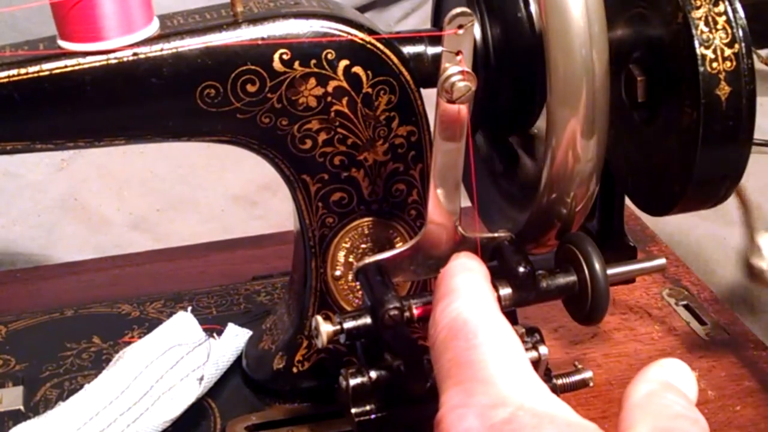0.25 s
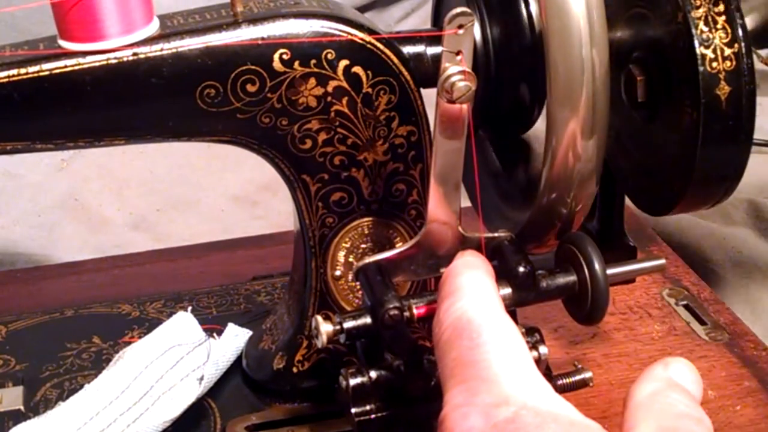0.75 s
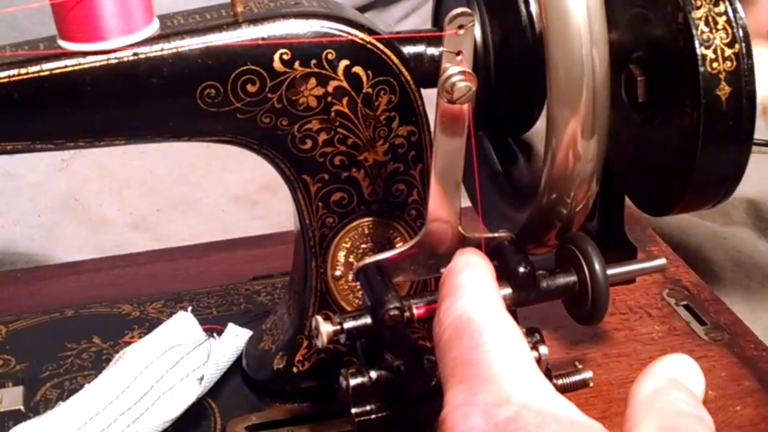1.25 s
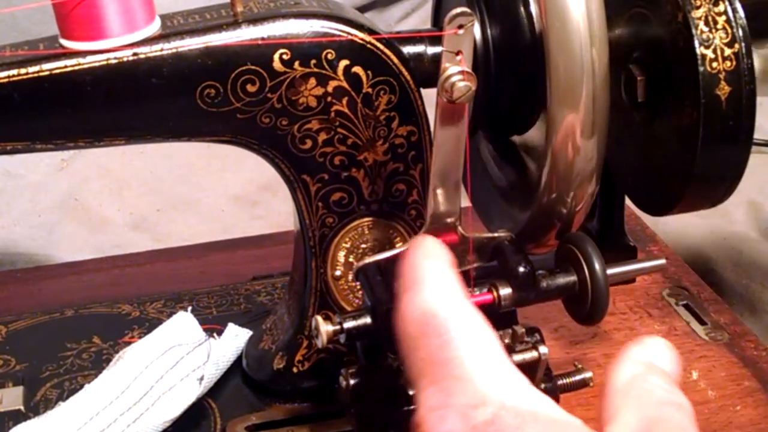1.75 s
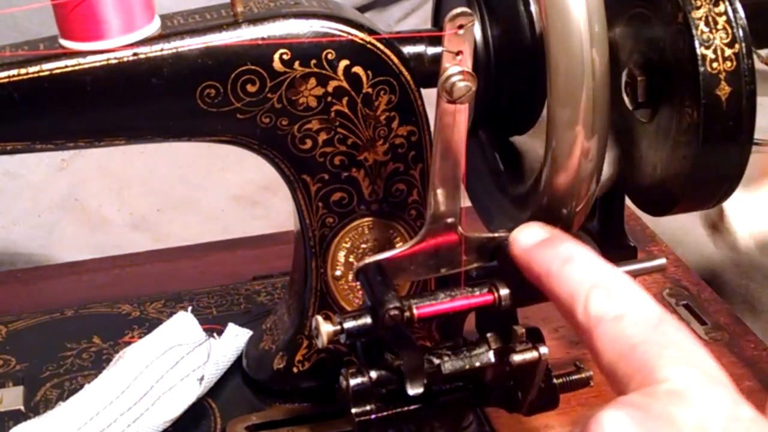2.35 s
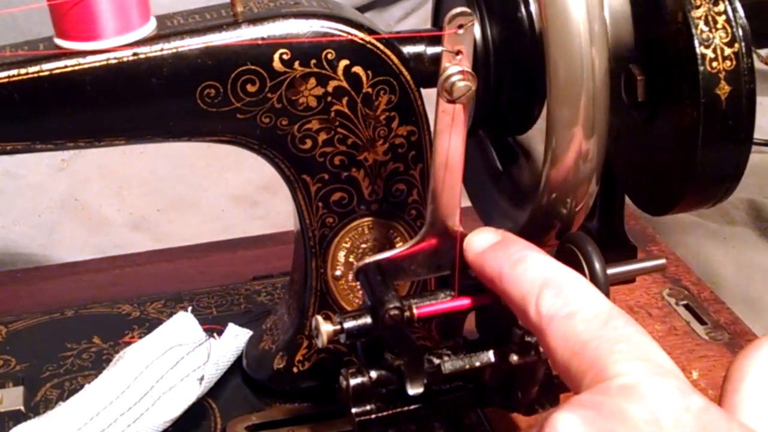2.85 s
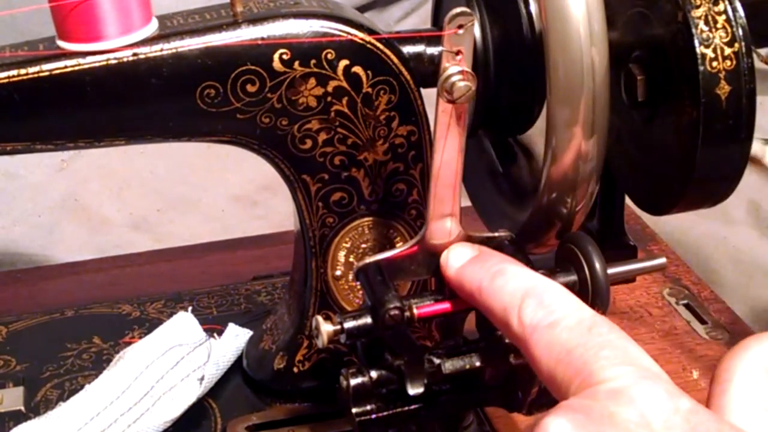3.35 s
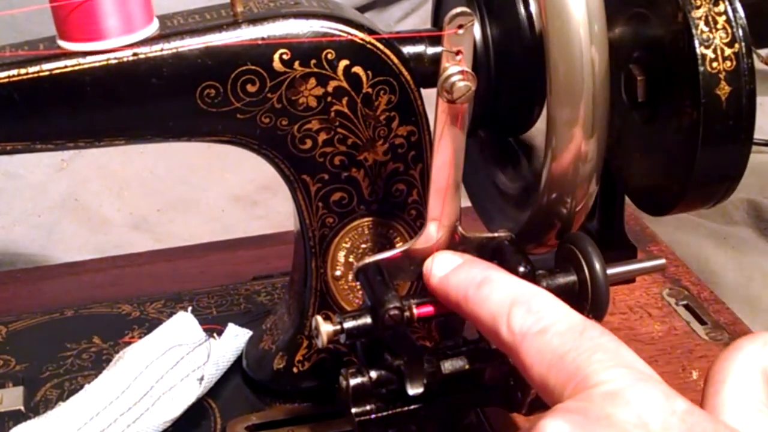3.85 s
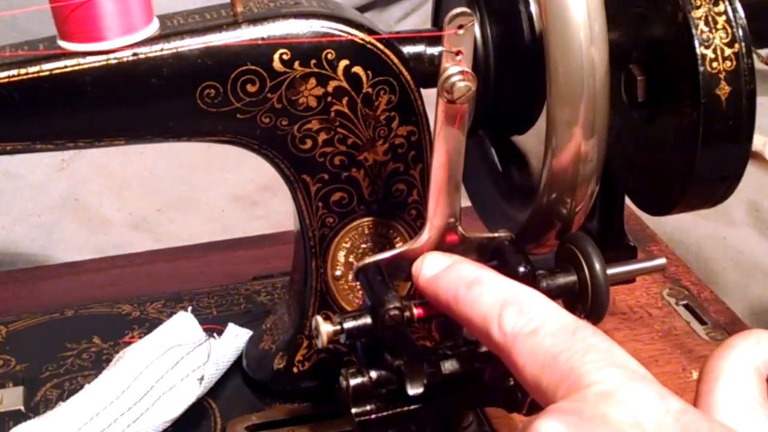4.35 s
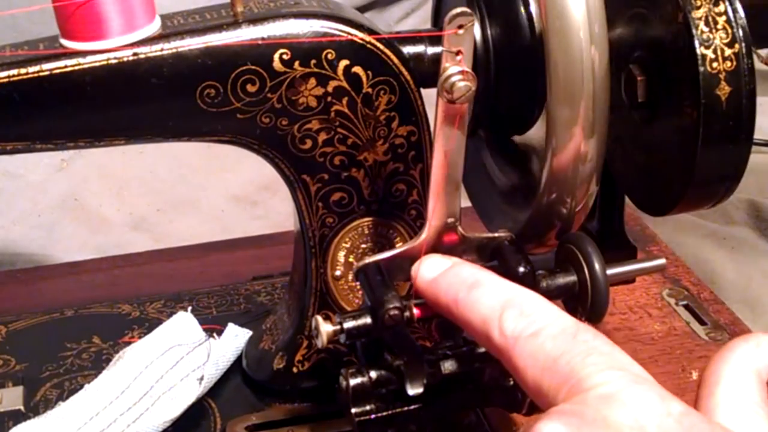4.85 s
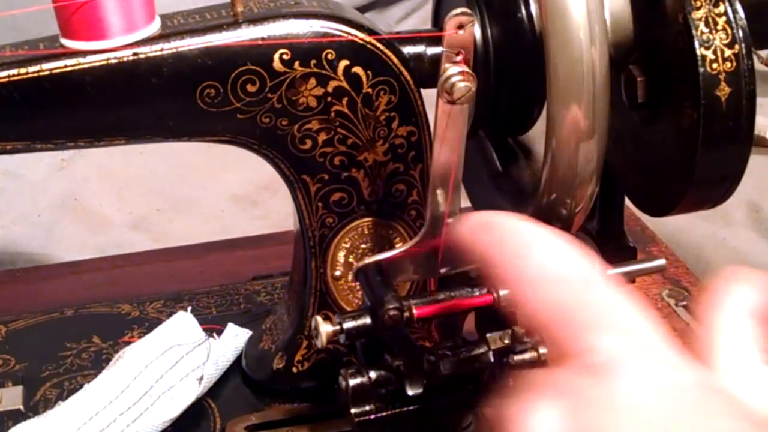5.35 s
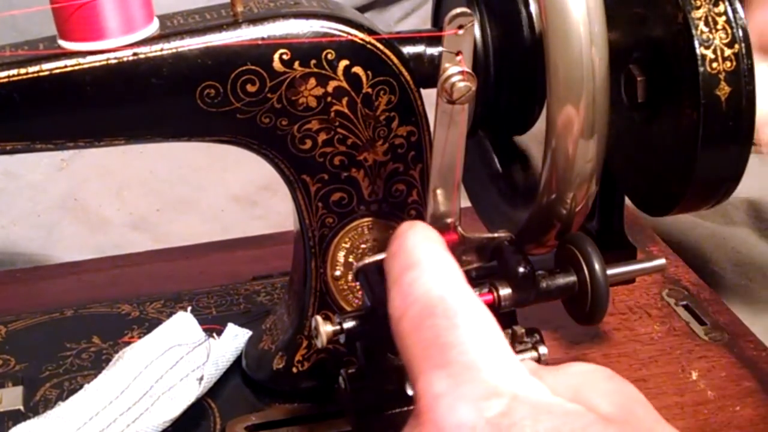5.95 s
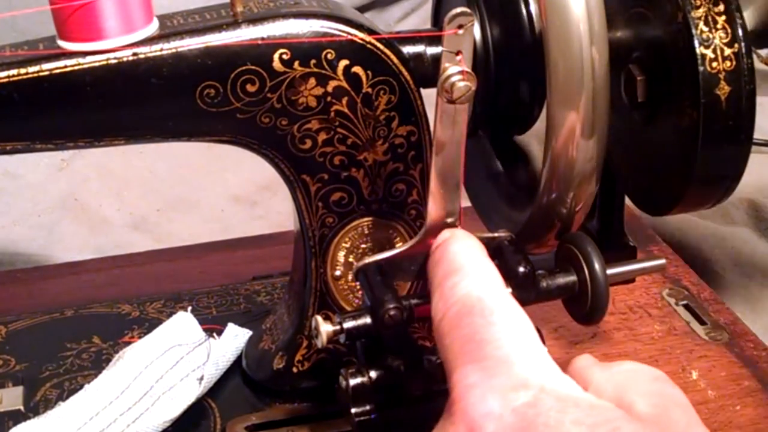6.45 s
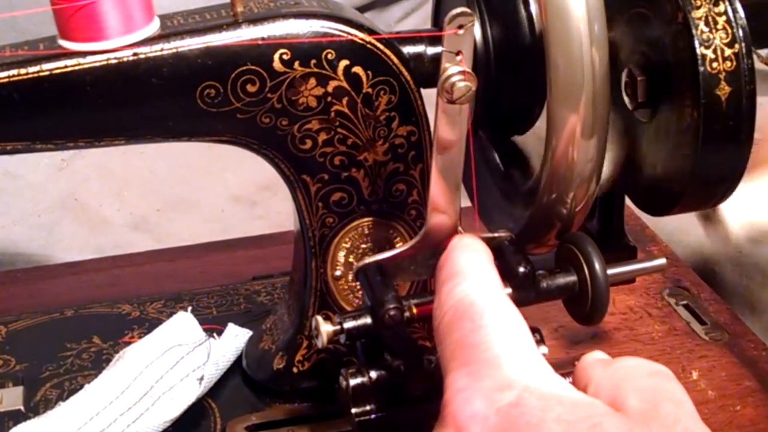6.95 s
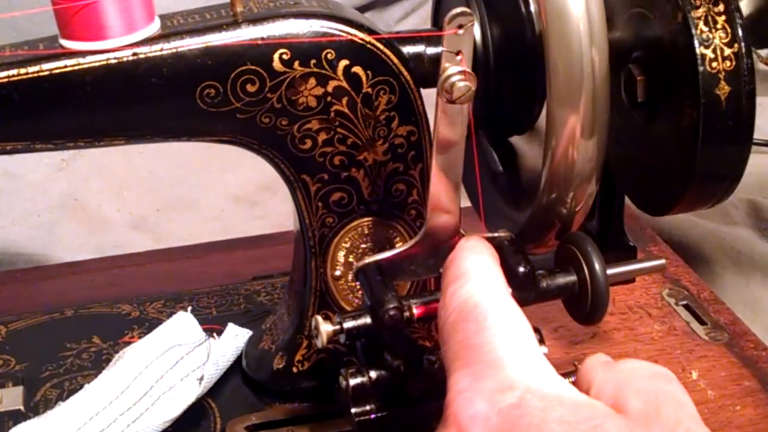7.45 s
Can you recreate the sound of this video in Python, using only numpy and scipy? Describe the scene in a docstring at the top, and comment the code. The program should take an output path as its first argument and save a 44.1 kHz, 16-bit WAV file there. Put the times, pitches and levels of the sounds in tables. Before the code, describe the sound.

Old hand-cranked sewing machine winder whirring fast in a quiet room, metallic gear rattle and fine hiss with ticks, faint pings and dry clicks.

```python
"""A quiet room, where a hand crank drives the bobbin winder of an old cast-iron sewing machine.
Gear impacts ring the iron body and wooden base as resonant noise, and thread and tyre rub out a hiss.
Shudders and light blows shake the body; the winder spindle ticks and knocks once a turn.
A loose steel part pings as dying sines, and dry clicks crack the thread guide and lever.
Two microphone ports hear it all, over room noise, mains hum and a distant engine."""
import sys
import numpy as np
from scipy import signal
from scipy.fft import rfft, irfft
from scipy.io import wavfile
from scipy.ndimage import uniform_filter1d

SR = 44100
rng = np.random.default_rng(int(sys.argv[2]) if len(sys.argv) > 2 else 0)


def put_to_file(sound):
    """Save the sound as 16-bit audio at rate SR, in the file named by the first command-line argument."""
    columns = np.atleast_2d(sound).T  # one column per channel
    safe = np.clip(columns, -1, 1)
    whole_steps = np.round(safe * 32767)
    wavfile.write(sys.argv[1], SR, whole_steps.astype(np.int16))


N = 339570
T = np.arange(N) / SR  # s
HZ = np.fft.rfftfreq(N, 1 / SR)

# Gear rattle under the crank, before lift and throb: start_s, level_db
CRANK_RATTLE = [(0, -51), (.41, -51), (.87, -56.5), (1.07, -52.5), (1.24, -55.5), (1.5, -51.5),
                (2.1, -53.5), (2.7, -51), (3.1, -49), (3.4, -50.5), (3.8, -52.5), (4.4, -51), (4.95, -54),
                (5.38, -50.5), (5.77, -53.5), (6.25, -50), (6.8, -51), (7.2, -52), (7.7, -52.5)]
# Spindle speed, surging with each push on the crank: start_s, speed_turns_per_s
SPINDLE_SPEED = [(0.0, 12.17), (0.35, 11.65), (0.85, 9.95), (1.25, 10.51), (1.65, 14.96), (2.27, 13.1),
                 (2.55, 15.3), (2.92, 15.21), (3.26, 16.54), (3.9, 11.92), (4.34, 14.62), (4.93, 12.59),
                 (5.33, 15.49), (5.7, 13.26), (6.06, 12.79), (6.38, 17.6), (6.66, 14.45), (7.13, 14.48),
                 (7.7, 12.52)]
# Gear shudders, runs of tooth slips: start_s, peak_db, slips_per_s, length_s (slips fill 0.67 of it)
SHUDDERS = [(0.009, -46.5, 560, 0.049), (0.044, -47.5, 600, 0.088), (0.232, -44, 570, 0.021),
            (0.348, -48, 619, 0.016), (0.436, -38, 640, 0.0048), (0.573, -44, 594, 0.012),
            (0.632, -44, 590, 0.017), (0.728, -46.5, 640, 0.035), (1.013, -44.8, 510, 0.0094),
            (1.036, -48, 630, 0.012), (1.057, -53, 580, 0.008), (1.313, -45.5, 650, 0.016),
            (1.502, -45, 610, 0.021), (1.577, -44.5, 570, 0.013), (1.632, -42, 610, 0.0094),
            (1.777, -40, 660, 0.017), (1.853, -36.5, 690, 0.0054), (2.061, -45.5, 560, 0.039),
            (2.247, -48, 300, 0.032), (2.291, -41.4, 570, 0.014), (2.434, -46, 620, 0.02),
            (2.48, -47, 620, 0.015), (2.782, -56, 480, 0.013), (2.825, -41, 625, 0.037),
            (2.853, -46, 640, 0.034), (2.998, -40, 830, 0.0079), (3.0, -51, 620, 0.0088),
            (3.035, -49, 640, 0.028), (3.067, -42, 630, 0.034), (3.169, -44.5, 780, 0.016),
            (3.292, -41.5, 550, 0.065), (3.339, -44.5, 460, 0.026), (3.391, -40.5, 770, 0.017),
            (3.493, -42, 680, 0.011), (3.793, -42, 590, 0.013), (3.938, -45, 650, 0.036),
            (4.083, -43, 540, 0.01), (4.591, -46.5, 670, 0.013), (4.718, -48, 630, 0.0089),
            (5.393, -46, 580, 0.041), (5.548, -43, 594, 0.013), (6.034, -48, 510, 0.0098),
            (6.124, -45, 580, 0.053), (6.153, -44, 620, 0.034), (6.172, -45, 610, 0.056),
            (6.199, -47, 643, 0.013), (6.262, -39.5, 640, 0.021), (6.306, -46, 520, 0.011),
            (6.433, -43, 590, 0.027), (6.479, -41.5, 740, 0.02), (6.542, -48.5, 650, 0.03),
            (6.594, -40.5, 780, 0.01), (6.658, -43.5, 620, 0.016), (6.731, -47, 560, 0.024),
            (7.068, -45.5, 597, 0.061), (7.395, -47, 630, 0.028), (7.485, -48, 450, 0.013),
            (7.56, -44.5, 610, 0.014), (7.672, -50, 440, 0.023)]
# Play of the spindle: start_s, tick_db, knock_db
SPINDLE_PLAY = [(0, -41, -49), (.57, -40, -45), (.66, -52, -70), (.96, -56, -75), (1.05, -50, -47.5),
                (1.7, -48, -43), (2.3, -52, -55), (2.6, -47, -43.5), (3.3, -56, -42.5), (4, -45, -48),
                (4.8, -62, -47.5), (5.3, -66, -41.5), (5.9, -62, -52.5), (6.4, -71, -40.5), (7.2, -52, -44),
                (7.7, -42, -44.5)]
# Single hard knocks of the bracket: start_s, peak_db
HARD_KNOCKS = [(1.0906, -47), (1.368, -46), (2.6582, -36.5), (2.824, -38), (3.0766, -49), (3.166, -38),
               (4.016, -40), (4.0756, -40), (4.5687, -42), (4.82, -39.5), (5.324, -48), (5.387, -41),
               (6.0655, -37.5), (6.265, -36.5), (6.439, -43), (7.4678, -37.5)]
# Handwheel turns, each striking a loose steel part twice: start_s, first_peak_db, second_peak_db
HANDWHEEL = [(-.04, -91, -69), (.3162, -49, -51), (.7163, -51.5, -56), (1.1677, -51, -52),
             (1.5454, -48, -49), (1.8502, -50, -47), (2.176, -50, -57), (2.4957, -46, -47),
             (2.7821, -48, -45), (3.0559, -51, -48), (3.33, -52, -50), (3.6252, -55, -51),
             (3.9754, -51, -50), (4.3056, -47.5, -47), (4.6204, -47.5, -54), (4.9611, -55, -62),
             (5.2789, -48, -51), (5.5792, -49, -48), (5.912, -49, -55), (6.2113, -50, -46),
             (6.4827, -44, -46.5), (6.7735, -46, -53), (7.0818, -52, -47), (7.3996, -45.5, -45.5),
             (7.74, -74, -70)]
# Stray strikes on the loose steel part: start_s, peak_db
STRAY_PINGS = [(1.658, -56), (2.892, -53), (3.17, -46.5), (3.364, -55), (4.498, -54), (5.207, -51),
               (5.528, -50), (5.848, -54), (7.276, -55)]
# Dry clicks and scrapes: start_s, peak_db, centre_hz, reach_octaves, chatter_s, bright_edge_db
CLICKS = [(.39, -41, 2270, 0.4, 0.0035, -32), (0.466, -42, 2000, 0.64, 0.005, -30),
          (1.17, -52, 5000, .8, .002, -20), (1.299, -45.5, 4000, 0.83, 0.0024, -12),
          (1.523, -43, 4560, 0.4, .002, -25), (1.528, -44, 1980, 0.46, 0.0074, -30),
          (2.0118, -37, 2400, 0.7, .011, -30), (2.632, -35.5, 4830, 0.94, 0.0024, -16),
          (2.9982, -31, 1600, 1.2, .0006, -30), (3.159, -42, 2170, 0.48, .003, -16),
          (3.538, -27.5, 6200, 1.0, .002, -8), (3.539, -40.5, 1790, 0.48, .001, -30),
          (3.7198, -39, 2370, 0.67, 0.0074, -18), (4.094, -39, 7040, 0.49, 0.0025, -9),
          (4.096, -43, 2500, .5, 0.0024, -30), (4.2205, -33.5, 5000, 0.9, .003, -12),
          (4.368, -45, 2200, .4, .025, -30), (4.428, -39, 2610, 0.69, .003, -13),
          (4.5122, -34.5, 5000, 0.8, .003, -14), (5.4222, -42, 1800, 0.53, .003, -24),
          (5.422, -44, 5600, .5, 0.0027, -15), (5.851, -46, 5000, 1.1, 0.0022, -14),
          (6.428, -47, 7900, 0.3, 0.005, -14), (6.429, -41, 2360, 0.61, 0.0054, -30),
          (6.438, -37.5, 5870, 0.89, 0.0045, -20), (6.478, -44, 5200, 0.61, .002, -10),
          (6.948, -43.5, 4000, 1.3, .002, -13), (7.3083, -29, 5100, .6, .004, -3),
          (7.309, -39, 2200, .6, .0015, -36), (7.337, -44, 6700, 0.45, 0.0018, -5),
          (7.41, -38, 6460, 0.51, 0.0013, -16), (7.484, -39.5, 6500, 0.32, 0.0017, -18),
          (7.563, -39, 6330, 0.62, 0.0022, -11), (7.623, -40, 2260, 0.45, .003, -25),
          (7.638, -39.5, 6750, 0.68, .002, -6), (7.685, -41, 2290, 0.45, 0.0022, -29)]

# Modes of the iron body and wooden base: pitch_hz, width_hz, level_db
BODY_MODES = [(305.5, 30, -5), (353.3, 50.4, -5), (444.6, 19, -4.5), (541.6, 22.5, -2.5), (609, 28.8, 1),
              (640.3, 28, -4), (693, 30, -2.5), (766.6, 23.5, -4.5), (867, 32, -9), (1025, 130, -9.5),
              (1167, 78, -7.5), (1332, 112, -12), (1612, 57, -14), (1870, 420, -17), (2270, 350, -17),
              (2620, 250, -22), (2980, 160, -20.5)]
# Bands of thread and tyre rubbing: pitch_hz, width_hz, level_db
RUB_MODES = [(3910, 1800, 2), (4490, 90, 3), (5130, 320, 4.2), (6700, 1400, 0), (7870, 150, 2),
             (8440, 710, -2), (9900, 620, -2.5), (11900, 3200, -6.5), (14300, 1200, -7)]
# Modes of the winder bracket: pitch_hz, width_hz, level_db
BRACKET_MODES = [(1073, 100, 3), (1134, 39, 7.5), (1317, 103, 1.5)]
# Modes of the spindle end: pitch_hz, width_hz, level_db
SPINDLE_END_MODES = [(12850, 400, 0), (13900, 600, -6), (5120, 250, -8)]
# Modes of the loose steel part: pitch_hz, width_hz, level_db
STEEL_MODES = [(3543, 21, 0), (4490, 60, -18), (5130, 170, -18), (7870, 90, -23)]
# Modes of the thread guide and lever, rung by the clicks: pitch_hz, width_hz, level_db
GUIDE_MODES = [(1240, 370, -6), (1750, 320, -2), (2300, 260, 0), (3050, 500, -6), (3750, 450, -4),
               (4500, 120, 3), (5130, 170, 5), (5700, 260, -1), (6800, 330, 1), (7880, 410, -1),
               (9500, 620, -7), (10500, 500, 0)]

# Microphone pair: pitch_hz, left_minus_right_db, left_lead_radians, likeness_0_to_1
PORTS = [(30, 1, 2.6, .6), (60, 1.5, 2, .15), (220, .5, 2, .2), (320, 1, .4, .65), (480, 7, -.3, .7),
         (610, 5.5, -.3, .92), (800, 2, .3, .93), (950, 2.5, .3, .95), (1200, 0, .3, .97),
         (1330, -2, .4, .9), (1500, -6, .6, .75), (1780, -7, -1.2, .25), (2000, -2, -np.pi, .8),
         (2150, 0, -np.pi, .98), (2350, 0, -np.pi, 1), (2680, 0, -np.pi, .998), (3000, -4, -1.8, .45),
         (3400, 0, 0, .99), (4050, 0, 0, .99), (4400, -1.5, 1.4, .5), (4850, 0, 2.8, .85),
         (5500, .5, np.pi, .85), (5800, .5, 3.6, .3), (6300, 1.5, 5.5, .62), (7000, 4, 5.9, .55),
         (7400, 3.5, 7, .12), (7800, 1, 8.7, .62), (8600, 3, 8.3, .35), (8900, 2, 7, .05),
         (9200, 1.5, 5.6, .3), (9900, 2, 4.8, .42), (10300, 2, 3.3, .12), (10600, 2, 2.3, .35),
         (12300, 1.5, -1.9, .3), (12900, 3.5, -3.3, .55), (13300, .5, -4.2, .4), (14000, 2.5, -6.4, .48),
         (15500, 3, -10, .35)]
# The machine arm hides the clicks from the right port: pitch_hz, level_db
ARM_SHADOW = [(6800, 0), (8200, -11)]
# Click treble comes from more nearly ahead: pitch_hz, share_of_usual_left_lead
CLICK_LEAD = [(3200, .95), (4500, .82)]
# Spectrum of the room noise, relative: pitch_hz, level_db_per_hz
ROOM_SPECTRUM = [(20, -10), (35, -8), (60, 3), (100, -3.5), (160, -1), (250, -6.5), (600, -21.5),
                 (2000, -26.5), (6000, -19), (11000, -20), (15500, -16)]
# Mains hum, before its waver: pitch_hz, level_db_rms
MAINS = [(60, -78), (120, -68), (140, -75.5)]
# Distant engine: start_s, pitch_hz, level_db_rms
ENGINE = [(0, 96, -57), (.5, 95, -58), (1, 93, -62), (1.5, 85, -71), (2.2, 80, -67.5), (2.7, 78, -70),
          (3.1, 88, -73), (3.5, 86, -69.5), (4, 84, -75), (4.5, 78, -63.5), (5.2, 77, -68.5),
          (5.8, 77, -94), (6.4, 75, -73), (6.8, 74, -65), (7.3, 74, -72), (7.7, 74, -66)]

# Hiss at -52 dB of rattle and 14 turns a second; then dB per dB of rattle and of speed
HISS_DB, HISS_FOLLOWS_GEARS, HISS_FOLLOWS_SPEED = -60.5, 1, 0.26
WHEEL_THROB_DB = 0.33  # the gears run tighter once a handwheel turn
BASE_TOP_HZ, BASE_EXTRA = 480, 0.51  # base modes below this swell more with cranking: extra dB per dB
SHAKE, SHAKE_S = 0.5, 0.024  # extra rattle gain after a -40.5 dB shudder, and its decay
SHUDDER_SKEW = 0.47  # under 1 a shudder starts faster than it ends
LIGHT_BLOW_DB, LIGHT_SPREAD_DB = 4.5, 1.5  # light blows over the rattle level, and their spread
TICK_SPREAD_DB, KNOCK_SPREAD_DB = 3, 2.5  # from turn to turn
SECOND_PING_TURNS = 1.05  # spindle turns between the two strikes
BOUNCE_S, BOUNCE_DB = 0.011, -11  # typical delay and loss of the bounce after a strike
FIRST_EDGE_DB = -6  # the first strike also clacks at one high mode
REBOUND_LOSS = 0.75  # share of force lost by the last close rebound
EDGE_MODE_HZ = 9000  # modes above this answer to the bright edge of a click
ROOM_DB = -58  # rms
BAND_TOP_HZ = 15490
FIRST_TURN = -0.67  # spindle position at the start, in turns
RATE = np.interp(T, *np.transpose(SPINDLE_SPEED))  # turns per s
TURN = FIRST_TURN + np.cumsum(RATE) / SR


def running():
    """Gear rattle in the body and rubbing hiss, both throbbing with the spindle."""
    gears_db = np.interp(T, *np.transpose(CRANK_RATTLE))
    angle = 2 * np.pi * TURN
    wheel_angle = 2 * np.pi * np.interp(T, np.transpose(HANDWHEEL)[0], np.arange(len(HANDWHEEL)))
    speed_db = 20 * np.log10(RATE / 14)
    hiss_db = HISS_DB + HISS_FOLLOWS_GEARS * (gears_db + 52) + HISS_FOLLOWS_SPEED * speed_db

    gear_throb = shaken() * amp(0.5 * np.cos(angle - 0.3) + 0.67 * wander(size=900))
    gears = rattle(BODY_MODES, per_s=650, spread_db=2.5, wash=0.74, throb=gear_throb,
                   own_db=2.0, base_db=BASE_EXTRA * (gears_db + 52.5))
    hiss_throb = amp(0.48 * np.cos(angle - 0.9) + 1.42 * wander(size=500))
    hiss = rattle(RUB_MODES, per_s=1500, spread_db=0.0, wash=0.86, throb=hiss_throb, own_db=2.05)
    gears_level = amp(gears_db + 0.5 + WHEEL_THROB_DB * np.cos(wheel_angle - 0.4))
    return gears * gears_level + hiss * amp(hiss_db)


def rattle(modes, per_s, spread_db, wash, throb, own_db, base_db=0):
    """Two unrelated trains of uneven impacts over a smooth wash; every mode swells in its own time."""
    hit = rng.random((2, N)) < per_s / SR
    size = amp(spread_db * np.minimum(rng.exponential(1, hit.sum()), 4))
    size /= np.sqrt((size ** 2).sum() / hit.size)
    smooth, out = wash * rng.standard_normal((2, N)), 0
    for k, (hz, width, db) in enumerate(modes):
        drive = (-1) ** k * smooth
        drive[hit] += size * rng.standard_normal(len(size))  # each impact lands differently on each mode
        drive = drive * throb * amp(own_db * wander(size=1200) + (hz < BASE_TOP_HZ) * base_db)
        # two-pole resonator
        r, step = np.exp(-np.pi * width / SR), 2 * np.pi * hz / SR
        ringing = signal.lfilter([0, r * np.sin(step)], [1, -2 * r * np.cos(step), r * r], drive)
        out = out + amp(db) * width * ringing
    return evened(out)


def shaken():
    """Gain on the gear rattle: it jumps at each shudder and dies away."""
    s, db = np.transpose(SHUDDERS)[:2]
    jumps = np.zeros(N)
    jumps[np.round(s * SR).astype(int)] = amp(db + 40.5)
    return 1 + SHAKE * signal.lfilter([1], [1, -np.exp(-1 / SHAKE_S / SR)], jumps)


def blows():
    """Gear shudders drive the body with runs of slips; uneven light blows land twice a spindle turn."""
    half_turns = np.arange(2 * int(TURN[-1]) + 1) / 2
    time_luck, level_luck = rng.standard_normal((len(half_turns), 2)).T
    s = when(half_turns + 0.0404 + 0.0522 * time_luck)
    light_db = np.interp(s, *np.transpose(CRANK_RATTLE)) + LIGHT_BLOW_DB + LIGHT_SPREAD_DB * level_luck
    light = strike(s, light_db, around(BODY_MODES, 556, 0.51), push_s=0.0006)
    out = np.r_[light, np.zeros(9000)]  # room for the last tails
    for (start, db, per_s, length), phase in zip(SHUDDERS, rng.random(len(SHUDDERS))):
        t = np.arange(0, 0.67 * length, 1 / SR)
        swell = np.sin(np.pi * (t / t[-1]) ** SHUDDER_SKEW)
        slips = swell * np.sin(2 * np.pi * (per_s * t + phase))
        shudder = signal.fftconvolve(slips, ring(around(BODY_MODES, per_s, 0.89)))
        out[round(start * SR):][:len(shudder)] += amp(db) * shudder / abs(shudder).max()
    return out[:N]


def spindle():
    """A tick as each turn starts, then three bracket knocks around a quarter turn; some single hard knocks."""
    turn = np.arange(int(TURN[-1]) + 1)
    s, tick_db, knock_db = np.transpose(SPINDLE_PLAY)
    time_luck = rng.random((len(turn), 3))
    tick_luck, knock_luck = rng.standard_normal((len(turn), 2)).T
    tick_db = np.interp(when(turn), s, tick_db) + TICK_SPREAD_DB * tick_luck
    knock_db = np.interp(when(turn), s, knock_db) + KNOCK_SPREAD_DB * knock_luck
    out = strike(when(turn) - 0.0015, tick_db, SPINDLE_END_MODES)
    for k in range(3):
        at = when(turn + 0.16 + 0.09 * k + 0.0628 * time_luck[:, k])
        out = out + strike(at, knock_db - 0.4 * k, BRACKET_MODES, push_s=0.00036)
    return out + strike(*np.transpose(HARD_KNOCKS), BRACKET_MODES, push_s=0.00038)


def pings():
    """Two strikes ring the loose steel in each handwheel turn, each with a bounce, plus a few strays."""
    s, first_db, second_db = np.transpose(HANDWHEEL)
    later = when(np.interp(s, T, TURN) + SECOND_PING_TURNS)
    at, db = np.r_[s, later], np.r_[first_db, second_db]
    luck = rng.random((2 * len(s), 2))
    bounce_at = at + BOUNCE_S * (0.3 + luck[:, 0])
    bounces = strike(bounce_at, db + BOUNCE_DB * (0.45 + luck[:, 1]), STEEL_MODES)
    clack = strike(s, first_db + FIRST_EDGE_DB, STEEL_MODES[2:3])
    strays = strike(*np.transpose(STRAY_PINGS), STEEL_MODES)
    return strike(at, db, STEEL_MODES) + bounces + clack + strays


def clicks():
    """A contact and its rebounds ring the guide modes near each centre, the top modes by their own share."""
    out, t = np.zeros(N + 8000), T[:2400]
    hz, width, db = np.transpose(GUIDE_MODES)[:, :, None]
    for click, luck in zip(CLICKS, rng.random((len(CLICKS), 3, 12))):
        s, peak_db, centre, octaves, chatter_s, edge_db = click
        share = amp(np.array(around(GUIDE_MODES, centre, octaves))[:, 2:])
        share = share + (hz > EDGE_MODE_HZ) * amp(db + edge_db)
        # seven close rebounds within the chatter, five weak ones over 22 ms
        delay = np.r_[0, chatter_s * luck[0, :7], 0.022 * luck[0, 7:]]
        close_force = (0.4 + 0.6 * luck[1, :7]) * (1 - REBOUND_LOSS * luck[0, :7])
        force = np.r_[1, close_force, 0.2 * luck[1, 7:]][:, None, None]
        since = t - delay[:, None, None]
        # contacts add in energy, each dying at the rate of the mode
        energy = force ** 2 * (since >= 0) * np.exp(-2 * np.pi * width * abs(since))
        swell = np.sqrt(energy.sum(0))
        tones = np.sin(2 * np.pi * (hz * t + luck[2][:, None]))
        crack = (share * width * swell * tones).sum(0)
        out[round(s * SR):][:len(crack)] += amp(peak_db) * crack / abs(crack).max()
    return out[:N]


def strike(s, db, modes, push_s=0.):
    """Rings the modes at each time; a longer push is a softer, duller blow."""
    hits = np.zeros(N)
    np.add.at(hits, np.clip(np.round(s * SR).astype(int), 0, N - 1), amp(db))
    answer = np.convolve(ring(modes), np.hanning(round(push_s * SR) + 3))
    return signal.oaconvolve(hits, answer / abs(answer).max())[:N]


def ring(modes):
    """Answer to one blow: dying sines that start together, peak 1; wider modes die faster."""
    t, out = T[:6000], 0
    for hz, width, db in modes:
        out = out + amp(db) * width * np.exp(-np.pi * width * t) * np.sin(2 * np.pi * hz * t)
    return out / abs(out).max()


def around(modes, hz, octaves):
    """The modes as a blow excites them that favours one pitch, 12 dB weaker at the given reach."""
    return [(f, width, db - 12 * (np.log2(f / hz) / octaves) ** 2) for f, width, db in modes]


def when(turn):
    """Time in seconds at which the spindle reaches a given turn."""
    return np.interp(turn, TURN, T)


def ports(near, other, hits, snaps):
    """The left port hears by another path: phase-shifted, tilted, noise partly unlike; right clicks duller."""
    hz, tilt_db, lead, like = np.transpose(PORTS)
    tilt = amp(read(hz, tilt_db) / 2)  # half the level difference to each port
    like, lead = np.clip(read(hz, like), 0, 1), read(hz, lead)
    near_spec, hits_spec, snaps_spec = rfft(near), rfft(hits), rfft(snaps)
    left_noise = like * near_spec + np.sqrt(1 - like ** 2) * rfft(other)
    left = (left_noise + hits_spec) * tilt * np.exp(1j * lead)
    snap_lead = read(*np.transpose(CLICK_LEAD)) * lead
    left = left + snaps_spec * tilt * np.exp(1j * snap_lead)
    shadow = amp(read(*np.transpose(ARM_SHADOW)))
    right = (near_spec + hits_spec + snaps_spec * shadow) / tilt
    return np.array([irfft(left, N), irfft(right, N)])


def air():
    """Two unrelated draws of room noise, low rumble to faint hiss."""
    shape = amp(read(*np.transpose(ROOM_SPECTRUM)))
    noise = irfft(rfft(rng.standard_normal((2, N))) * shape, N)
    return evened(noise) * amp(ROOM_DB)


def drones():
    """Wavering mains hum and a far engine, each a sine a little apart in phase at the two ports."""
    phase, hum = np.array([[0.7], [-0.7]]), 0  # radians, left and right
    for hz, db in MAINS:
        hum = hum + amp(db + 1.5 * wander(size=6000)) * np.sin(2 * np.pi * hz * T + phase)
    s, hz, db = np.transpose(ENGINE)
    engine_angle = 2 * np.pi * np.cumsum(np.interp(T, s, hz)) / SR
    engine = amp(np.interp(T, s, db)) * np.sin(engine_angle + phase)
    return np.sqrt(2) * (hum + engine)  # rms to peak


def amp(db):
    """Decibels to gain."""
    return 10 ** (np.asarray(db) / 20)


def evened(x):
    """Scales to rms 1."""
    return x / np.sqrt(np.mean(x ** 2) + 1e-20)


def read(hz, value):
    """A table over log frequency, at every bin."""
    return np.interp(np.log(HZ + 1), np.log(hz), value)


def wander(size):
    """Slow random drift of rms 1: noise averaged twice over size samples."""
    once = uniform_filter1d(rng.standard_normal(N), size)
    return evened(uniform_filter1d(once, size))


def scene():
    """Machine and room noise heard through the ports, over the drones."""
    near, other = running() + air()
    hits = spindle() + blows() + pings()
    return ports(near, other, hits, clicks()) + drones()


def record(dry):
    """Band limit of the recorder: a steep low-pass."""
    low_pass = signal.firwin(1023, BAND_TOP_HZ, window=("kaiser", 9), fs=SR)
    return signal.oaconvolve(dry, low_pass[None], "same")


dry = scene()
out = record(dry)
put_to_file(out)
```